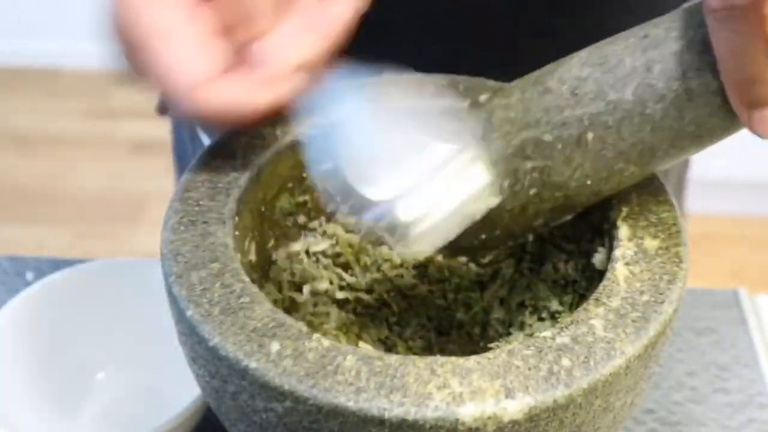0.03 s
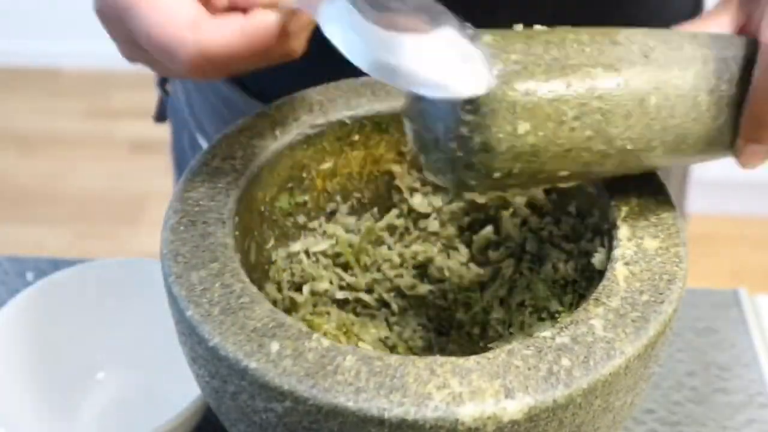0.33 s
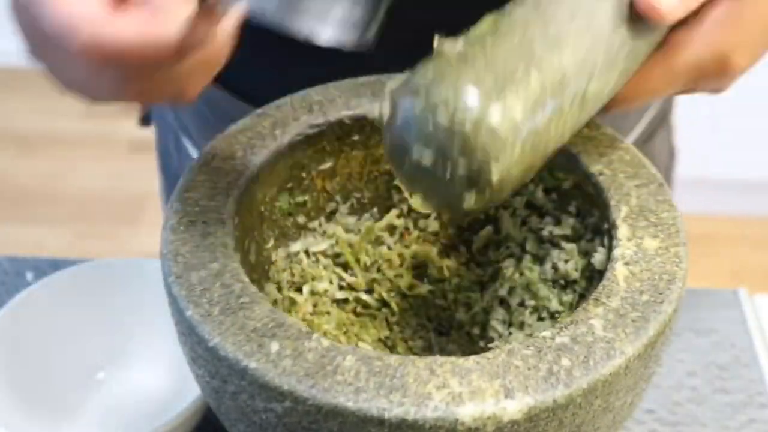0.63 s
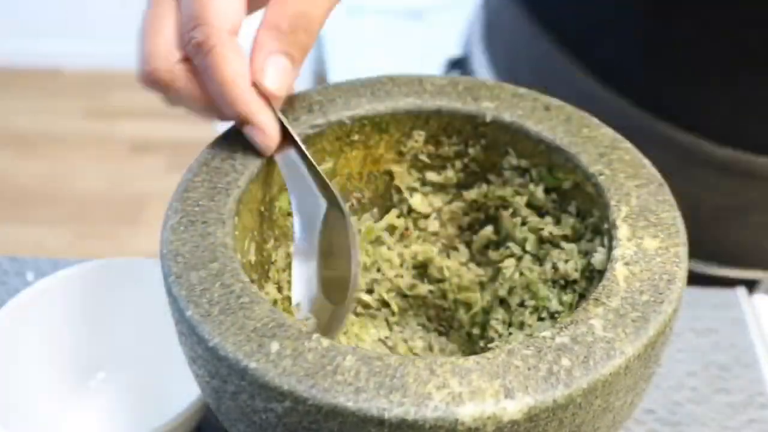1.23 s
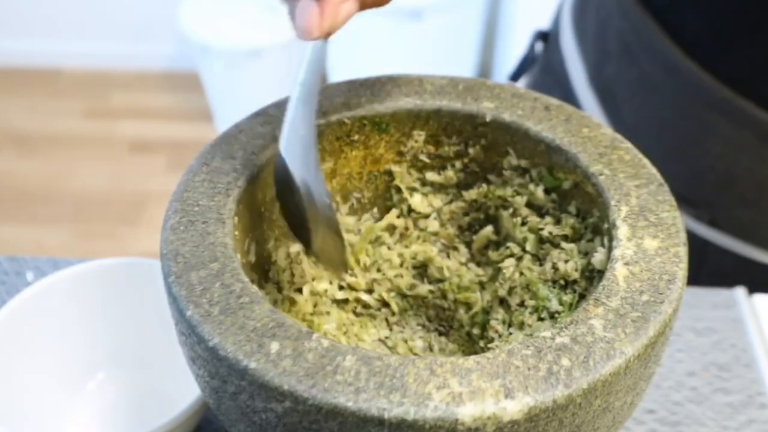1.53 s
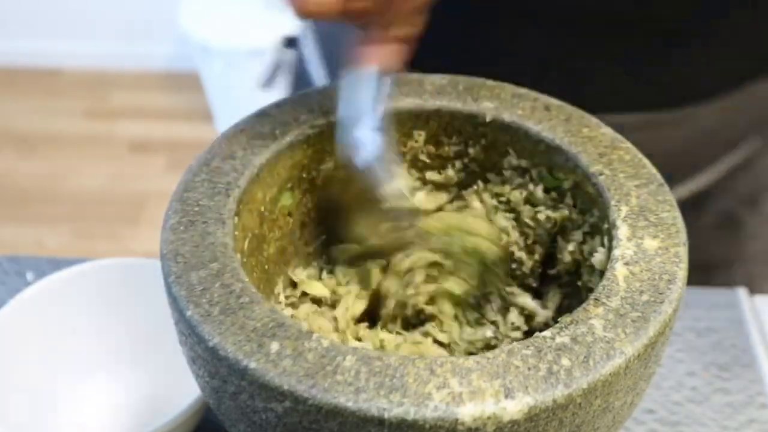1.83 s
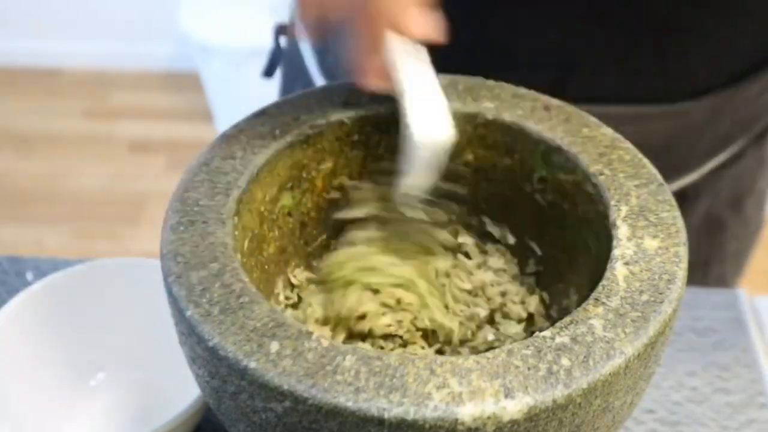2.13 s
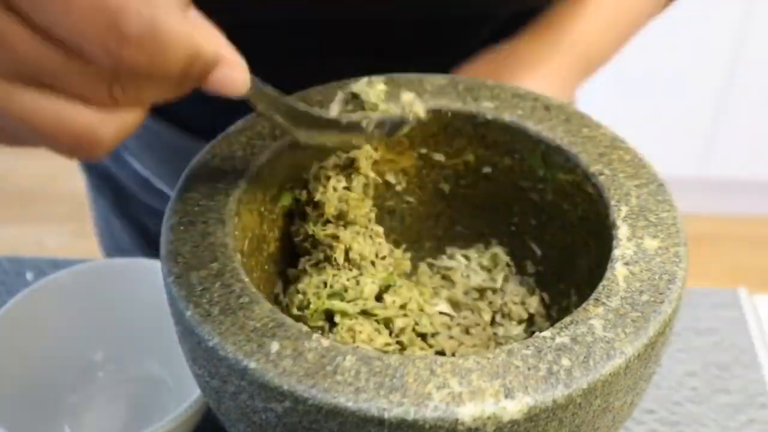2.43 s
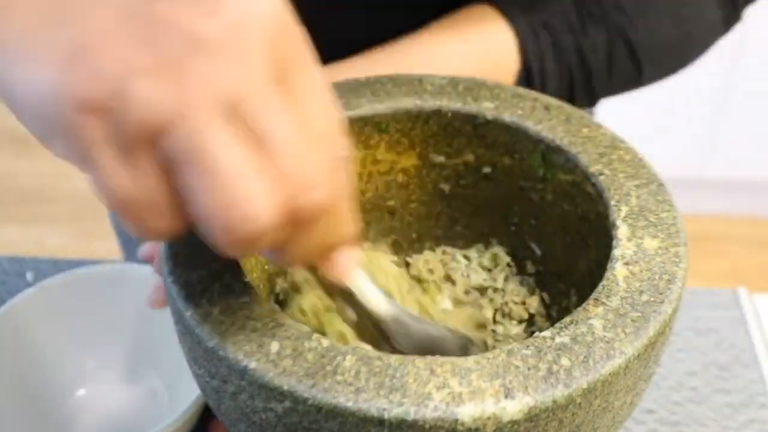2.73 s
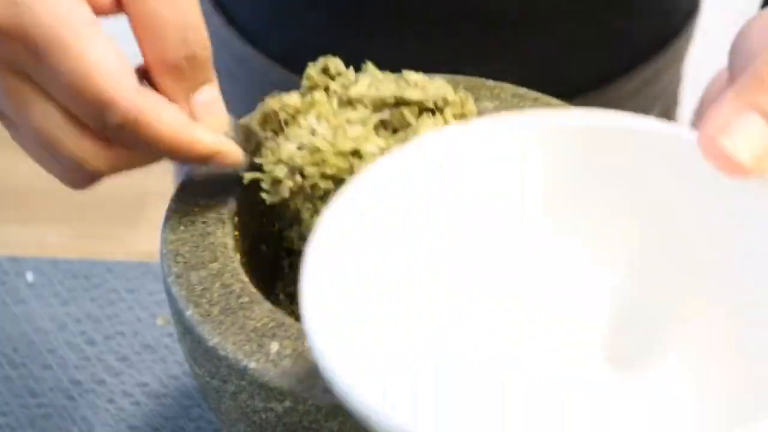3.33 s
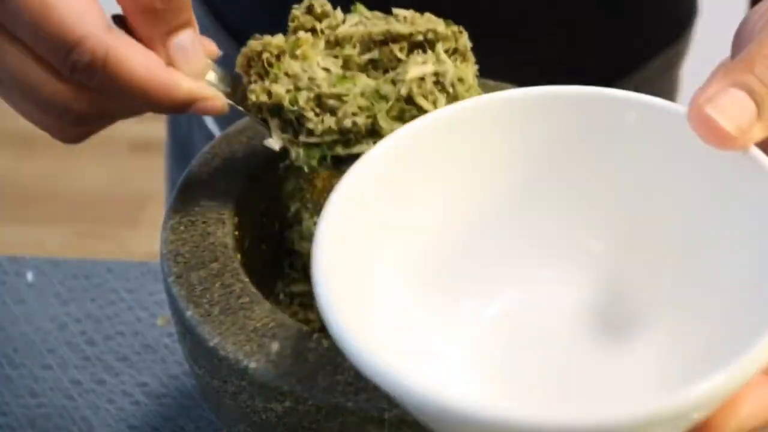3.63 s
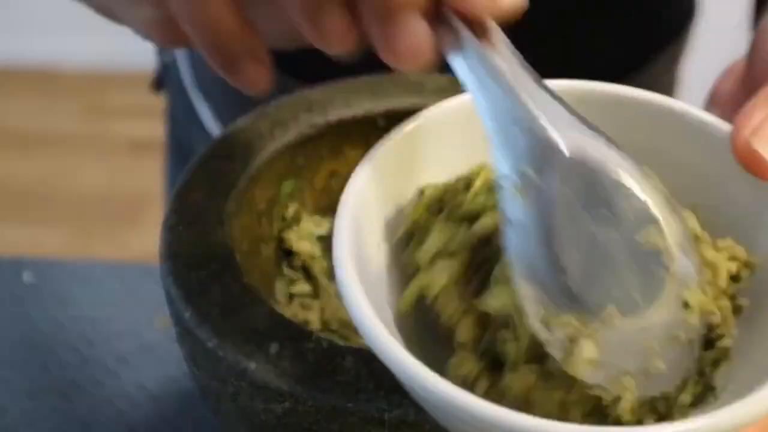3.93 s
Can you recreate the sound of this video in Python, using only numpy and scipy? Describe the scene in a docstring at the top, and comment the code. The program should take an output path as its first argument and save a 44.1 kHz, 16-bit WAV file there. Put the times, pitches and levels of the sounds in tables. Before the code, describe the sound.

A metal spoon scrapes a stone pestle in quick, gritty strokes. The pestle thuds down, then the spoon scrapes round the mortar through wet herbs, clinks once, and soft knocks follow, close by in a small kitchen.

```python
"""A steel spoon scrapes herb paste off a stone pestle in quick, gritty strokes, its edge ticking on the
stone. The pestle is set down with a thud. The spoon then scrapes round the hollow stone mortar, digs
through the wet herbs, which crackle and squelch, and clinks on the stone. Last come soft knocks as the
heaped spoon is lifted out, probably clumps dropping. A small kitchen surrounds it all."""
import sys
import numpy as np
from scipy import signal
from scipy.fft import rfft, irfft
from scipy.io import wavfile
from scipy.ndimage import uniform_filter1d

SR = 44100
rng = np.random.default_rng(int(sys.argv[2]) if len(sys.argv) > 2 else 0)


def output_pcm(signal):
    """Save a mono or channel-first signal as 16-bit PCM at the path in sys.argv[1].

    Samples are clipped to [-1, 1] before scaling.
    """
    pcm = np.clip(np.atleast_2d(signal).T, -1, 1) * 32767
    wavfile.write(sys.argv[1], SR, np.round(pcm).astype(np.int16))


N = 176400

# Spoon strokes on the pestle, then in the mortar. Each row: start, rise and hold in seconds,
# level in dB, squeak pitch in Hz, then hollow, body and treble EQ in dB.
PESTLE_STROKES = [(0.0, 0.00049, 0.0033, -29, 3500, 7.5, -8, 3),
                  (.046, 0.023, 0.017, -27, 3900, 3, -7, -0.5), (.156, 0.0056, .034, -36.5, 3720, 7, -7, 1),
                  (.243, 0.015, 0.021, -26.5, 3790, 8, -8.5, 2.5), (.395, .012, 0.016, -32, 3530, 1, 0, 6),
                  (.497, 0.0039, 0.021, -30.5, 2784, 10.5, -1.5, 2),
                  (.594, 0.015, 0.035, -32, 3940, 0.5, -2.5, 5.5),
                  (.713, 0.012, 0.024, -20.5, 3370, -2, -9, 1),
                  (.738, 0.013, 0.0029, -17.5, 4300, -1.5, -5, 3),
                  (.829, .013, 0.0082, -32.5, 4770, 7, 3.5, -1.5),
                  (.858, 0.0071, 0.0039, -22, 4520, -2.5, -1, 1),
                  (.949, 0.026, 0.0036, -25, 3980, -6.5, -1, 0),
                  (.965, 0.0047, 0.0078, -15.5, 4790, 0, -7.5, 7),
                  (1.067, 0.0086, 0.024, -39.5, 1900, 10, 4, 5),
                  (1.267, 0.0067, 0.023, -47, 2070, 0, 8.5, 13)]
MORTAR_STROKES = [(1.616, 0.0095, 0.04, -33.5, 4770, 1, -1, -7),
                  (1.648, 0.023, 0.032, -23.5, 3330, -3, -2.5, 4),
                  (1.788, 0.014, 0.035, -37.5, 4030, 4.5, -9, 4.5),
                  (1.838, .004, .03, -21.5, 4040, -5, 0.5, 0.5),
                  (1.854, 0.0097, 0.011, -14.5, 2080, 0, 26, -8), (1.981, 0.011, .03, -30, 4730, 0, -8, 2),
                  (2.013, 0.004, 0.03, -35.5, 2035, 9, 17, 11),
                  (2.101, 0.011, 0.017, -33.5, 703, 15.5, -3, 2),
                  (2.129, 0.012, 0.022, -17, 3330, 2, 11, 5.5),
                  (2.254, 0.0035, 0.027, -43.5, 680, 17.5, -9, -5),
                  (2.287, 0.0087, 0.032, -27.5, 4570, -4, -2, 2),
                  (2.483, 0.011, 0.03, -24, 2140, 12, 6, 0.5),
                  (2.618, 0.0037, 0.016, -23.5, 3150, -4, -6.5, 5)]
# Centres of the contact EQ in Hz: hollow, body, spoon and treble.
CONTACT_BANDS_HZ = [790, 1900, 3900, 9000]
# Colour of steel rubbing on each stone. Each row: frequency in Hz, gain in dB.
PESTLE_COLOUR = [(60, -25.5), (350, -21), (550, -28.5), (1150, -20), (1700, -8), (3000, 1.5), (4200, 0),
                 (5200, -9), (6900, -11.5), (8400, -16.5), (10000, -20), (11300, -25.5), (12400, -55)]
MORTAR_COLOUR = [(60, -21), (450, -33), (700, -10), (1300, -8.5), (2300, -0.5), (3000, 1), (4700, -3),
                 (5400, -12), (6600, -13.5), (8000, -23), (9900, -17.5), (11300, -27.5), (12400, -57)]
# The hollow and the spoon ringing at each stone. Each row: pitch in Hz, width in Hz, lift in dB.
PESTLE_RESONANCES = [(741, 40.4, 22), (795, 34, 17.5), (2100, 110, -1.5), (4790, 58, 16.5),
                     (9610, 136, 10.5)]
MORTAR_RESONANCES = [(746, 77, 3), (877, 64, 4.2), (3330, 51, 1), (4790, 110, 2.8)]
# Fader rides for the stirred herbs and the handling rumble. Each row: time in seconds, level in dB.
STIR_FADER = [(0, -57), (1.28, -84), (1.33, -57.5), (1.42, -62), (1.56, -61), (1.74, -46), (1.95, -65),
              (2.42, -58.5), (2.6, -58), (2.74, -39.5), (2.79, -44.5), (2.82, -39.5), (2.86, -44.5),
              (2.91, -42.5), (3.05, -55.5), (3.18, -53), (3.4, -58), (3.53, -51), (3.62, -57.5),
              (3.88, -55.5), (3.96, -49.5)]
RUMBLE_FADER = [(0, -47), (.1, -56), (.25, -50.5), (.45, -63.5), (1.2, -61.5), (1.65, -45.5), (1.95, -62.5),
                (2.3, -54), (2.66, -42), (3.1, -56), (3.5, -45), (3.85, -48), (4, -42)]
# Colours of the wet herbs, the rumble and the kitchen air. Each row: frequency in Hz, gain in dB.
HERB_COLOUR = [(60, -6.5), (450, 3.5), (1200, -6.5), (2500, -4.5), (4200, -8.5), (6000, -17.5),
               (10000, -25.5), (12400, -41.5)]
RUMBLE_COLOUR = [(20, -19.5), (125, 2), (210, -7), (280, -20), (500, -18), (4000, -77)]
AIR_COLOUR = [(30, -8.5), (200, 1), (1000, -4.5), (5000, -9), (10000, -26.5), (12400, -58.5)]
# The mortar's hollow around the herbs. Each row: pitch in Hz, width in Hz, lift in dB.
HERB_RESONANCES = [(785, 72, 4.5)]
# The spoon's edge lands or catches on grit. Each row: start in seconds, level in dB,
# squeak pitch in Hz, then hollow, body and treble EQ in dB.
EDGE_TAPS = [(0.1478, -12, 3200, 2, -3.5, 2.5), (0.3849, -20.5, 3900, 9.5, -6.5, 8.5),
             (.498, -31.5, 2760, 20, 2, -6), (1.586, -39.5, 4700, 24, 5, 14),
             (1.6383, -12, 4950, 14, 2, -1.5), (1.863, -11.5, 1880, 7, 19, -5),
             (1.878, -8.5, 2420, -4, 19, -16), (1.976, -25, 4630, 9.5, -4, 5.5),
             (2.096, -22.5, 3790, 10, -15, -21), (2.25, -28, 674, 30, 2, -6),
             (2.608, -23.5, 3270, -10, 5, 2), (2.625, -17, 2830, 4, 0, -14),
             (2.637, -18, 3240, -5, -1, -16)]
# The pestle settles on the counter. Each row: start in seconds, level in dB.
PESTLE_LANDINGS = [(1.4473, -13), (1.459, -17.5)]
# Pockets of paste sucking loose. Each row: start and length in seconds, level in dB, pitch in Hz.
PASTE_POCKETS = [(2.666, 0.084, -33, 400), (2.771, 0.066, -42, 436), (2.869, .055, -38, 820),
                 (3.23, 0.12, -44.5, 716)]
# Partials of the clink. Each row: pitch in Hz, level in dB, seconds to fall by 60 dB.
CLINK_PARTIALS = [(785, -13, 0.049), (1236, -7.5, 0.033), (1490, -15.5, 0.057), (2420, -24, .05),
                  (3160, -11, 0.032), (3437, 0.5, 0.06), (6060, -14.5, 0.047)]
# Soft knocks in the hollow. Each row: start in seconds, level in dB, bass and treble EQ in dB.
SOFT_KNOCKS = [(3.196, -26, -5, 3), (3.2014, -19, -4.5, 3), (3.2124, -17, -11.5, -3),
               (3.2309, -25, -5.5, -3), (3.271, -36.5, -8, -12), (3.333, -24, -5, 0),
               (3.665, -17.5, -1.5, -28), (3.678, -14.5, -6, -21), (3.688, -19, -1, -17)]
# Colour of each kind of hit. Each row: frequency in Hz, gain in dB.
TAP_COLOUR = [(60, -26), (400, -28.5), (1200, -15.5), (2100, -7), (2900, 4), (4000, 2), (4900, -1),
              (5600, -12.5), (8000, -23), (10300, -19), (12400, -43)]
THUD_COLOUR = [(30, -36), (80, -11), (160, -4), (250, -7), (400, -19.5), (700, -20.5), (1200, -22.5),
               (3700, -30.5), (6500, -52), (12000, -71.5)]
CLINK_COLOUR = [(50, -29.5), (180, 1), (330, -9.5), (800, 3.5), (1300, -5), (2000, -6), (3000, -4),
                (4400, -33.5), (6200, -11), (8000, -36.5), (11000, -30.5), (12500, -67)]
KNOCK_COLOUR = [(40, -15), (130, 12), (260, -1.5), (600, -8), (1000, -2.5), (1400, -6.5), (1900, -18),
                (2800, -22), (4000, -45), (12000, -81)]
# Resonances that the hits set ringing. Each row: pitch in Hz, width in Hz, lift in dB.
TAP_RESONANCES = [(769, 94, 16.4), (2120, 92, 2), (4770, 130, 7)]
THUD_RESONANCES = [(132, 29, 2), (199, 37, -0.5)]
KNOCK_RESONANCES = [(742, 82, 6.5), (820, 82, 8), (3350, 32, 25)]
# The kitchen's reverb time. Each row: frequency in Hz, seconds to fall by 60 dB.
ROOM_DECAY = [(400, 0.59), (2200, 0.4), (5000, 0.1651), (11000, 0.42)]
# Stereo width. Each row: frequency in Hz, side gain in dB.
STEREO_WIDTH = [(100, -35.5), (400, -19.5), (1000, -13), (2200, -14.5), (4500, -4.5), (8000, 4)]

PESTLE_SLIPS_PER_S, MORTAR_SLIPS_PER_S, CRACKLES_PER_S = 2800, 1800, 900
RISE_CURVE, RELEASE_T60_S = 1.1, 0.043
TRAIL_DB, TRAIL_T60_S = -12.5, 0.13  # the spoon drags lightly on as it lifts
SQUEAK_Q, SQUEAK_DB, SQUEAK_DRIFT, RIPPLE_DB = 34, 6, 0.008, 3.5
SCRAPE_SEND_DB, KNOCK_SEND_DB, CLINK_SEND_DB = -19.5, -20, -24.5


def amp(db):
    """Decibels to gain."""
    return 10 ** (np.asarray(db) / 20)


def unit(x):
    """Scales to rms 1."""
    return x / np.sqrt(np.mean(x ** 2) + 1e-20)


def curve_at(points, hz):
    """Reads a curve on a log-frequency axis."""
    point_hz, value = np.transpose(points)
    return np.interp(np.log(hz + 1), np.log(point_hz + 1), value)


def fader(points):
    """A fader ride in dB as a gain for each sample."""
    return amp(np.interp(np.arange(N) / SR, *np.transpose(points)))


def add(mix, start, sound):
    """Mixes a sound in at a start time in seconds."""
    part = mix[max(round(start * SR), 0):][:len(sound)]
    part += sound[:len(part)]


def body(colour, resonances=(), eq=((1, 0), (2, 0)), size=8192):
    """An object's impulse response, of energy 1: a broad colour with ringing resonances on top."""
    hz = np.fft.rfftfreq(size, 1 / SR)
    cepstrum = irfft(np.log(amp(curve_at(colour, hz) + curve_at(eq, hz))))
    causal = 2 * cepstrum[:size // 2] * (np.arange(size // 2) > 0)  # minimum phase keeps attacks sharp
    broad = np.exp(rfft(causal, size))
    peaks = sum(amp(db) / (1 + 2j * (hz - pitch) / width) for pitch, width, db in resonances)
    impulse = irfft(broad * (1 + peaks))[:size // 2]
    return impulse / np.linalg.norm(impulse)


def grains(count, per_s, spread_db):
    """Tiny clicks at random times and of uneven size."""
    fires = rng.random(count) < per_s / SR
    size = np.minimum(rng.exponential(1, count), 4)
    sign = rng.choice([-1, 1], count)
    return unit(fires * sign * amp(spread_db * size))


def contact(colour, resonances, squeak_hz, eq_db, bands=48):
    """The spoon's place and angle tilt its colour; each contact has its own peaks, notches and squeak."""
    pitch = squeak_hz * (1 + SQUEAK_DRIFT * rng.standard_normal())
    squeak = (pitch, pitch / SQUEAK_Q, SQUEAK_DB)
    hollow_db, body_db, treble_db = eq_db
    hz = np.geomspace(CONTACT_BANDS_HZ[0], CONTACT_BANDS_HZ[-1], bands)
    tilt = curve_at(list(zip(CONTACT_BANDS_HZ, (hollow_db, body_db, 0, treble_db))), hz)
    ripple = RIPPLE_DB * np.pad(rng.standard_normal(bands - 2), 1)
    return body(colour, [*resonances, squeak], list(zip(hz, tilt + ripple)))


def spoon_scrapes(strokes, colour, resonances, slips_per_s, chatter_db=1.5):
    """Steel slips over the stone's grain: dense clicks swell, hold and die, shifting in colour."""
    out, t = np.zeros(N), np.arange(SR // 5) / SR
    for start, rise, hold, db, squeak_hz, *eq_db in strokes:
        lifted = np.maximum(t - rise - hold, 0)
        trail = amp(TRAIL_DB - 60 * lifted / TRAIL_T60_S)
        release = np.maximum(amp(-60 * lifted / RELEASE_T60_S), trail)
        pressure = np.minimum(t / rise, 1) ** RISE_CURVE * release
        chatter = amp(chatter_db * unit(uniform_filter1d(rng.standard_normal(len(t)), size=130)))
        grit = grains(len(t), slips_per_s, spread_db=2)
        drag = 0.4 * rng.standard_normal(len(t))
        friction = pressure * unit(chatter * (grit + drag))
        travel = np.minimum(t / (rise + hold), 1) ** 2
        for share in (1 - travel, travel):  # crossfade between two points of contact
            response = contact(colour, resonances, squeak_hz, eq_db)
            add(out, start, amp(db) * signal.fftconvolve(share * friction, response))
    return out


def herb_crackle(lumps_db=3.5):
    """Wet fibres crackle as they are moved, swelling in random lumps across time and pitch."""
    clicks = grains(N, CRACKLES_PER_S, spread_db=0.5) * fader(STIR_FADER)
    crackle = signal.fftconvolve(clicks, body(HERB_COLOUR, HERB_RESONANCES))[:N]
    _, _, bands = signal.stft(crackle, SR, nperseg=512)
    patches = uniform_filter1d(rng.standard_normal(bands.shape), size=5, axis=0)
    lumps = unit(uniform_filter1d(patches, size=8, axis=1))
    return signal.istft(bands * amp(lumps_db * lumps), SR, nperseg=512)[1][:N]


def rumble_and_air(air_db=-61.5):
    """The bed: low handling rumble in the centre, faint kitchen air out wide."""
    centre, left, right = rng.standard_normal((3, N))
    rumble = signal.fftconvolve(centre, body(RUMBLE_COLOUR))[:N]
    air = np.array([signal.fftconvolve(side, body(AIR_COLOUR))[:N] for side in (left, right)])
    return amp(air_db) * air + fader(RUMBLE_FADER) * rumble


def impact(crunch, t60_s, size=3000):
    """The attack of a hit: a sharp push, then a brief crunch of noise."""
    t = np.arange(size) / SR
    burst = rng.standard_normal(size) * amp(-60 * t / t60_s)
    force = (t == 0) + crunch * burst / np.linalg.norm(burst)
    return force / np.linalg.norm(force) * np.sqrt(0.003 * SR)  # the energy of 3 ms at level 1


def spoon_taps():
    """The spoon's edge meets the stone in short, damped ticks."""
    out = np.zeros(N)
    for start, db, squeak_hz, *eq_db in EDGE_TAPS:
        hit = impact(crunch=1.38, t60_s=0.027)
        response = contact(TAP_COLOUR, TAP_RESONANCES, squeak_hz, eq_db)
        add(out, start, amp(db) * signal.fftconvolve(hit, response))
    return out


def pestle_thuds():
    """The heavy pestle lands on the counter and rocks once."""
    out, counter = np.zeros(N), body(THUD_COLOUR, THUD_RESONANCES)
    for start, db in PESTLE_LANDINGS:
        add(out, start, amp(db) * signal.fftconvolve(impact(crunch=1.74, t60_s=0.069), counter))
    return out


def paste_squelches(band_ratio=1.5):
    """Pockets of paste suck loose, each a low swell of band-passed clicks."""
    out = np.zeros(N)
    for start, length, db, pitch in PASTE_POCKETS:
        swell = np.hanning(int(length * SR))
        pocket = signal.butter(1, [pitch / band_ratio, pitch * band_ratio], "bandpass", fs=SR)
        clicks = grains(len(swell), CRACKLES_PER_S, spread_db=2.5)
        suck = signal.lfilter(*pocket, signal.lfilter(*pocket, clicks))
        add(out, start, amp(db) * swell * unit(suck))
    return out


def spoon_clink(start_s=2.9372, rise_s=0.0016, knock_db=-6):
    """The spoon slips and strikes the stone: a hard knock and a bright ring."""
    out, t = np.zeros(N), np.arange(SR // 4) / SR
    ring = sum(amp(db - 60 * t / t60) * np.sin(2 * np.pi * hz * t) for hz, db, t60 in CLINK_PARTIALS)
    knock = signal.fftconvolve(impact(crunch=0.94, t60_s=0.044), body(CLINK_COLOUR))
    add(out, start_s, ring * np.minimum(t / rise_s, 1))
    add(out, start_s, amp(knock_db) * knock)
    return out


def soft_knocks():
    """Dull plops that sound the hollow of the mortar."""
    out = np.zeros(N)
    for start, db, bass_db, treble_db in SOFT_KNOCKS:
        eq = [(200, bass_db), (700, 0.0038), (1400, 0), (3000, treble_db)]
        hollow = body(KNOCK_COLOUR, KNOCK_RESONANCES, eq)
        add(out, start, amp(db) * signal.fftconvolve(impact(crunch=1.0, t60_s=0.078), hollow))
    return out


def kitchen_reverb(send, predelay_s=0.002, mono_below_hz=400):
    """The walls return a short diffuse tail, centred in the bass and wide above it."""
    hz, t, (left, other) = signal.stft(rng.standard_normal((2, SR // 2)), SR, nperseg=256)
    shared = (1 / (1 + (hz / mono_below_hz) ** 2))[:, None]
    right = shared * left + np.sqrt(1 - shared ** 2) * other
    decay = amp(-60 * t / curve_at(ROOM_DECAY, hz)[:, None])
    tail = signal.istft(np.array([left, right]) * decay, SR, nperseg=256)[1]
    tail *= np.clip(np.arange(tail.shape[1]) / SR / predelay_s - 1, 0, 1)
    return signal.fftconvolve(send[None], tail / np.linalg.norm(tail[0]), axes=1)[:, :N]


def stone_scatter(mid, balance_db=-0.63):
    """Scatter from the nearby stone shifts the phase between the ears, mostly in the treble."""
    hz, _, bands = signal.stft(mid, SR, nperseg=256)
    scatter = unit(uniform_filter1d(rng.standard_normal(bands.shape), size=5, axis=1))
    width = amp(curve_at(STEREO_WIDTH, hz))[:, None]
    side = signal.istft(1j * bands * scatter * width, SR, nperseg=256)[1][:N]
    return np.array([mid + side, mid - side]) * amp([[balance_db / 2], [-balance_db / 2]])


def scene():
    """The mix: scraping, dull hits and the clink, each with its own reverb send, over the bed."""
    scraping = spoon_scrapes(PESTLE_STROKES, PESTLE_COLOUR, PESTLE_RESONANCES, PESTLE_SLIPS_PER_S)
    scraping += spoon_scrapes(MORTAR_STROKES, MORTAR_COLOUR, MORTAR_RESONANCES, MORTAR_SLIPS_PER_S)
    scraping += spoon_taps() + herb_crackle() + paste_squelches()
    dull_hits = pestle_thuds() + soft_knocks()
    clink = spoon_clink()
    send = amp(SCRAPE_SEND_DB) * scraping + amp(KNOCK_SEND_DB) * dull_hits + amp(CLINK_SEND_DB) * clink
    room = kitchen_reverb(send)
    return stone_scatter(scraping + dull_hits + clink) + room + rumble_and_air()


def record(dry, ceiling_db=-0.9, cutoff_hz=12300):
    """A soft clip rounds off the loudest peak, then a steep low-pass trims the top."""
    clipped = dry / (1 + (dry / amp(ceiling_db)) ** 6) ** (1 / 6)
    lowpass = signal.firwin(255, cutoff_hz, window=("kaiser", 9), fs=SR)
    return signal.oaconvolve(clipped, lowpass[None], "same")


dry = scene()
out = record(dry)
output_pcm(out)
```